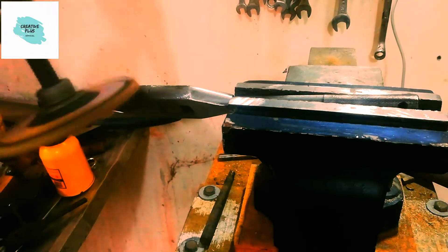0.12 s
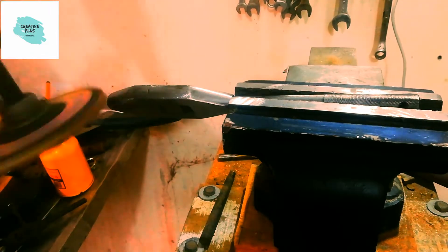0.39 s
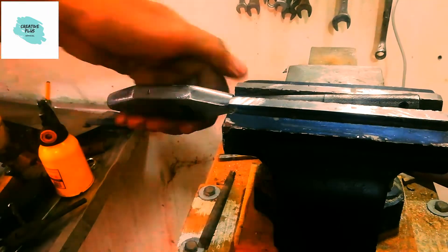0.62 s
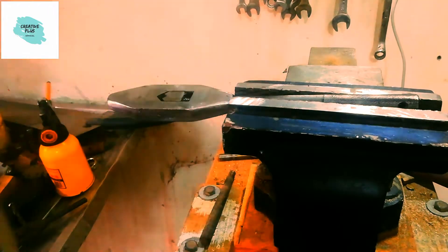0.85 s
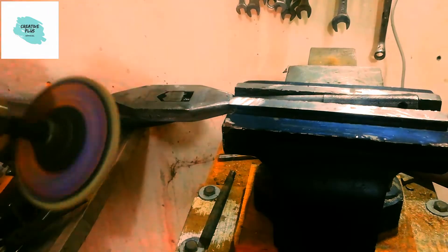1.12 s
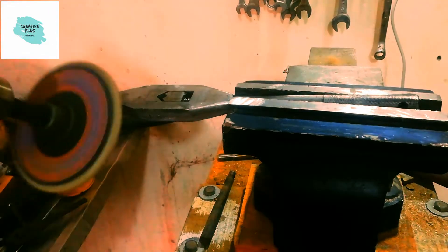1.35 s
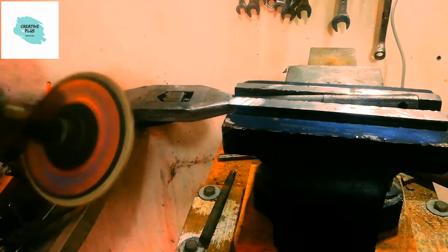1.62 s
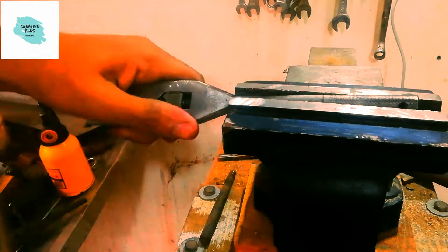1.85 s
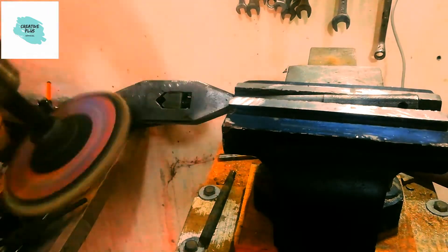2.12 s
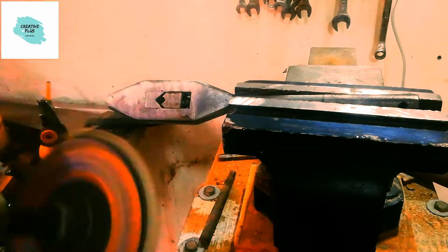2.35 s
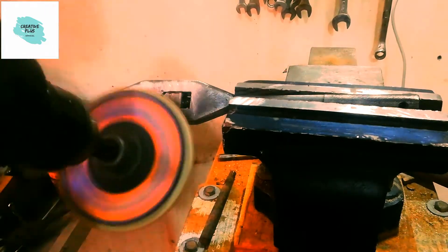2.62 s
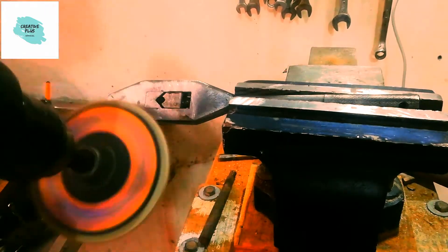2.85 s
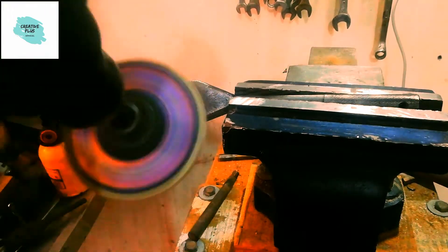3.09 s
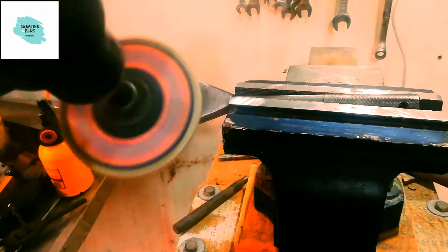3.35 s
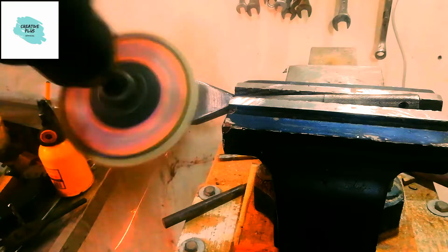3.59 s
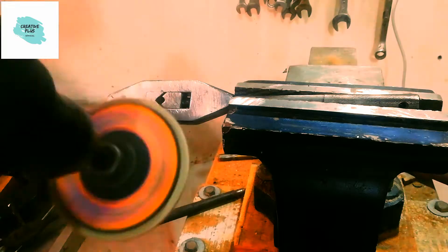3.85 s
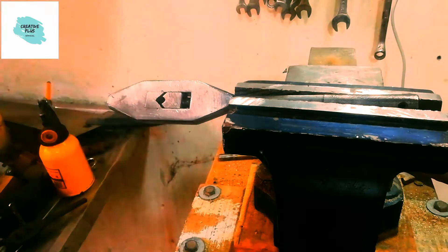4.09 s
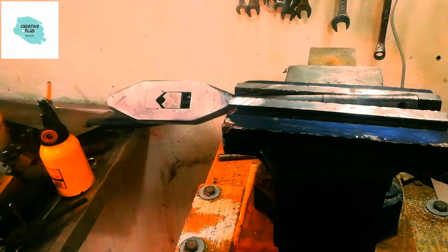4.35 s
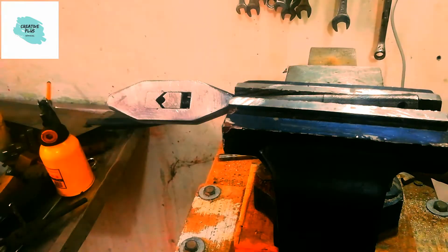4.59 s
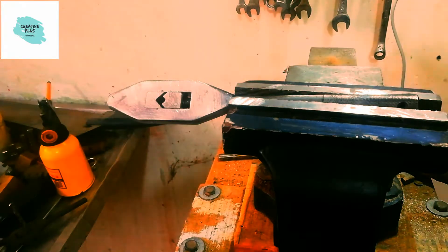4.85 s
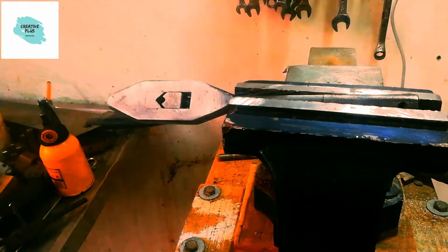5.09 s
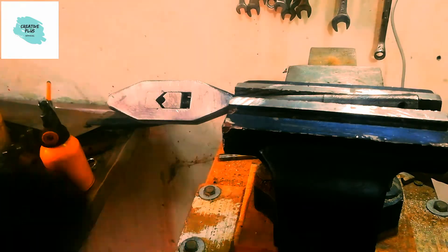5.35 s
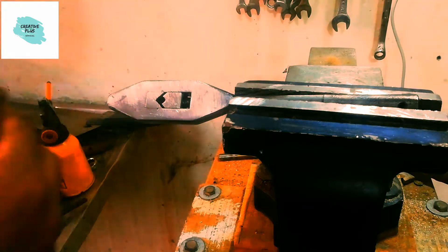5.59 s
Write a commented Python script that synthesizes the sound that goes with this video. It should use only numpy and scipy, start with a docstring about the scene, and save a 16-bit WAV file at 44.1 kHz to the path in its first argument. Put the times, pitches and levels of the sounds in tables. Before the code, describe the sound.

Close stereo sound in a small, dry workshop. From 0 s a hand-held disc grinder is already running: dense airy roar around 4 to 5 kHz, brighter hiss on top, a lower motor drone and faint fast flutter, weighted somewhat right. A brief gust pops at 0.5 s. From 1 to 1.7 s its draught batters the microphone with low thuds and raspy crackle, the level ducking; sharp bursts return at 2.0 and 2.35 to 2.6 s. A gear whine near 1.9 kHz, pulsing about forty times a second, strengthens from 2.5 to 4 s, sagging in pitch, with more gusts. Around 4.05 and 4.12 s light knocks ring clamped steel. The tool moves far right; from 4.5 to 5 s a thin high whine drops rapidly as it coasts and rattles on the bench. Short hollow drags come at 5.1 and 5.2 s, then soft grainy wipes at 5.4 and 5.65 s over near silence.

```python
"""Power tool close to the microphone in a small workshop

A hand-held tool with an abrasive disc runs near a two-port microphone: fan air hisses (coloured noise), gears sing (tones).
Its draught sweeps eddies (pressure pulses) across the ports, so that the limiter ducks.
The tool is carried off to the right and its fan whine sinks as it coasts; light knocks ring clamped steel (damped sines).
Then something is dragged over the bench (slips through resonances) and wiped (grainy noise); the room stays quiet."""
import sys
import numpy as np
from scipy import signal
from scipy.fft import rfft, irfft, next_fast_len
from scipy.io import wavfile
from scipy.ndimage import uniform_filter1d, minimum_filter1d, map_coordinates

SR = 44100
rng = np.random.default_rng(int(sys.argv[2]) if len(sys.argv) > 2 else 0)


def voltage_ratio(decibels):
    """Convert decibels (scalar or array-like) to amplitude ratios, 20 dB per decade."""
    exponent = np.asarray(decibels, float) / 20
    return 10 ** exponent


def put_to_file(sound):
    """Save the sound as 16-bit audio at rate SR, in the file named by the first command-line argument."""
    columns = np.atleast_2d(sound).T  # one column per channel
    safe = np.clip(columns, -1, 1)
    whole_steps = np.round(safe * 32767)
    wavfile.write(sys.argv[1], SR, whole_steps.astype(np.int16))


N = 251811  # length [samples]

# the tool as it is moved and turned before the microphone:
# (time [s], roar level [dB], roar left over right [dB], hiss over roar [dB])
TOOL_PATH = [(0, -25, -8, 2.5), (.55, -24, -4.5, 2.5), (.71, -24.5, -9.5, 0.5), (.96, -23.5, -5, 3.5),
             (1.23, -25, -4.5, 3), (1.54, -26.5, -5, 3.5), (1.87, -23.5, -6, 1.5), (2.05, -26, -4, 3.5),
             (2.22, -24, -7.5, 5.5), (2.33, -24, -4.5, 3.5), (2.42, -22.5, 0.5, 0.5),
             (2.52, -23, -2.5, 1.2), (3.8, -23, -2, 0.1), (4.36, -26, -11, 4.5), (4.53, -26, -20.5, 4.5),
             (4.7, -32.5, -35, 5), (4.82, -39, -17, 2), (5.08, -52, -18, -1.2)]


def unit(x):
    """x at rms 1."""
    return x / np.sqrt(np.mean(x ** 2) + 1e-20)


def curves(rows):
    """One value per sample for each column after the time."""
    s, *columns = np.transpose(rows)
    return [np.interp(np.arange(N) / SR, s, column) for column in columns]


def during(rows):
    """1 while a table lasts, fading to 0 over 29 ms outside it."""
    t = np.arange(N) / SR
    return np.clip(np.minimum(t - rows[0][0], rows[-1][0] - t) / 0.029 + 1, 0, 1)


def wobble(rate):
    """A smooth random curve, rate knots a second."""
    knots = rng.standard_normal(int(N * rate / SR) + 4)
    return map_coordinates(knots, [np.arange(N) * rate / SR])


def throb(depth, rate, turn):
    """A swell that repeats rate times a second, starting at a phase in turns."""
    return 1 + depth * np.cos(2 * np.pi * (rate * np.arange(N) / SR + turn))


def tone(hz):
    """A sine of rms 1 on a pitch curve."""
    return np.sqrt(2) * np.sin(2 * np.pi * np.cumsum(hz) / SR)


def filtered(x, response):
    """x times a complex response of frequency."""
    m = next_fast_len(N + 8192)
    return irfft(rfft(x, m) * response(np.fft.rfftfreq(m, 1 / SR)), m)[..., :N]


def late(x, ms):
    """x delayed by ms milliseconds."""
    return filtered(x, lambda hz: np.exp(-2j * np.pi * hz * ms / 1000))


def noise(spectrum, patchy_db=1.5):
    """Noise of rms 1 coloured by (Hz, dB) points, with patches of random gain."""
    f, db = np.transpose(spectrum)
    z = signal.stft(rng.standard_normal(N), nperseg=512)[2]
    field = uniform_filter1d(rng.standard_normal(z.shape), size=4, axis=0)
    field = uniform_filter1d(field, size=8, axis=1)
    patchy = signal.istft(z * voltage_ratio(patchy_db * unit(field)), nperseg=512)[1][:N]
    return unit(filtered(patchy, lambda hz: voltage_ratio(np.interp(np.log(hz + 1), np.log(f + 1), db))))


def strokes(rows, rise, fall):
    """dB per sample of each (start, end, dB, dB) row: a rise, a slope from start to end, a fall (dB per s)."""
    s0, s1, db0, db1 = np.transpose(rows)[:4, :, None]
    t = np.arange(N) / SR
    progress = np.clip((t - s0) / np.maximum(s1 - s0, 1 / SR), 0, 1)
    slope_db = db0 + (db1 - db0) * progress
    return slope_db - rise * np.maximum(s0 - t, 0) - fall * np.maximum(t - s1, 0)


def ports(make, pan_db, direct):
    """Two ports: a shared direct sound, earlier on the nearer side, and the room's share, different on each."""
    away_s, back_s = 4.08, 5.36  # sounds come from the right of the microphone between these times
    near, t = make(), np.arange(N) / SR
    gone = np.clip(np.minimum(t - away_s, back_s - t) / 0.055, 0, 1)
    left = (1 - gone) * near + gone * late(near, 0.656)
    right = (1 - gone) * late(near, 0.3576) + gone * near
    direct = np.clip(direct, 0, 1)  # share of the power
    shared, diffuse = np.array([left, right]), np.array([make(), make()])
    pair = np.sqrt(direct) * shared + np.sqrt(1 - direct) * diffuse
    sides = voltage_ratio(np.array([pan_db / 2, -pan_db / 2]))
    return pair * sides * 2 / np.hypot(*sides)  # the same total power for any pan


def dip_db():
    """Brief dips of the air noise under the hardest gusts, as a depth in dB at each sample."""
    # (time [s], depth in the roar [dB], a negative depth being a swell, half width [s])
    dips = [(1.09, 8, 0.12), (2.01, -0.5, .05), (2.36, 3, 0.06), (2.461, 4, .05)]
    t = np.arange(N) / SR
    return sum(db * np.clip(1 - np.abs(t - s) / half, 0, 1) for s, db, half in dips)


def air():
    """Cooling air torn by the fan: a roar with the vent's resonance, a hiss and its thin top, flickering together."""
    # colours of the three bands: (frequency [Hz], relative level [dB])
    roar_colour = [(1350, -36.5), (2300, -9.5), (2840, -2.5), (3950, 3.5), (4750, 2.5), (5470, -1),
                   (6000, -4), (7800, -15), (13200, -120)]
    hiss_colour = [(3530, -37.5), (6000, -3), (7370, -1), (8470, 1), (9470, -4), (10500, -9.5),
                   (13600, -27.5), (22000, -120)]
    top_colour = [(6180, -46), (10500, -7.5), (12300, -1), (15100, -4), (15900, -17)]
    # the vent's resonance shifts as the tool is turned: (time [s], frequency [Hz])
    vent = [(0.0, 4130), (0.42, 3950), (0.48, 4745), (1.04, 4550), (1.13, 4245), (1.91, 4650), (2.18, 4250),
            (2.5, 4776), (2.88, 4190), (3.48, 3997), (4.6, 4520)]
    hiss_dip, top_dip = 1.38, 1.8  # dip depth over that of the roar
    top_over_hiss_db, top_lost = -12, 0.59  # top_lost: dB per dB of turning right
    roar_level_db, roar_pan, bright_db = curves(TOOL_PATH)
    hiss_pan = 2.2 * roar_pan - 6  # dB; the hiss beams more narrowly than the roar
    roar_db = roar_level_db - dip_db()
    hiss_db = roar_level_db + bright_db - hiss_dip * dip_db()
    top_db = roar_level_db + bright_db + top_over_hiss_db + top_lost * roar_pan - top_dip * dip_db()
    flicker = 0.78 * wobble(12) + 0.82 * wobble(30)  # dB

    def roar_noise():
        resonance = unit(wobble(1100)) * tone(curves(vent)[0])
        return noise(roar_colour) + voltage_ratio(-6.5) * resonance

    roar = voltage_ratio(roar_db + flicker) * ports(roar_noise, roar_pan, direct=0.48)
    hiss = voltage_ratio(hiss_db + flicker) * ports(lambda: noise(hiss_colour), hiss_pan, direct=0.13)
    top = voltage_ratio(top_db + flicker) * ports(lambda: noise(top_colour), 0.25 * hiss_pan, direct=0.37)
    flutter = throb(0.14, 43.02, -.15)  # the air noise flutters faintly
    return (roar + hiss + top) * flutter * during(TOOL_PATH)


def motor():
    """The housing drones; armature and gear mesh are tones with a fuzzy skirt."""
    # housing colour: (frequency [Hz], relative level [dB])
    drone_colour = [(35, -81), (60, -42), (312, -20), (485, -14), (650, -11.5), (964, -2.5), (1500, -3.5),
                    (2000, -0.5), (2600, -9), (3400, -17.5), (6000, -120)]
    # armature hum: (time [s], level [dB])
    hum_levels = [(0, -40.5), (2.2, -44), (3, -35), (4.5, -42.5), (4.58, -66)]
    # gear mesh: (time [s], pitch [Hz], level [dB])
    gears = [(0, 1960, -52), (1.1, 1970, -45), (1.33, 1970, -30), (1.82, 1969, -38.5), (2.5, 1990, -32.5),
             (2.72, 1944, -24), (3.02, 1881, -22.5), (3.2, 1886, -27.5), (3.4, 1887, -27), (3.7, 1885, -27),
             (3.85, 1915, -21.5), (4, 1898, -29.5), (4.1, 1954, -45), (4.4, 1980, -44.5)]
    off_s, coast_db_per_s = 4.644, 42  # the drone fades as the motor coasts
    free_hz, free_rough, rough_per_hz = 1970, .8, .0085  # load pulls the mesh down and steadies it
    disc_hz, disc_turn, wander_turns = 40.9, .46, .07  # disc turns a second; start and scatter in turns
    coast_db = coast_db_per_s * np.maximum(np.arange(N) / SR - off_s, 0)
    drone_db = -30.5 - 0.22 * dip_db() - coast_db
    pan_db = 0.77 * curves(TOOL_PATH)[1] + 5
    drone = voltage_ratio(drone_db + 0.72 * wobble(20)) * ports(lambda: noise(drone_colour), pan_db, direct=0.25)
    hum_swell = 0.93 + 0.49 * unit(wobble(50))
    hum = voltage_ratio(curves(hum_levels)[0]) * hum_swell * tone(482 + 7 * wobble(30))
    mesh_hz, mesh_db = curves(gears)
    rough = np.clip(free_rough - rough_per_hz * (free_hz - mesh_hz), 0, 1)
    swell = unit(throb(1.0, disc_hz, disc_turn + wander_turns * wobble(9)) ** 1.02)  # once per turn
    # worn teeth roughen the swell
    teeth = swell * (np.sqrt(1 - rough) * voltage_ratio(1.3 * wobble(40)) + np.sqrt(rough) * unit(wobble(260)))
    mesh = voltage_ratio(mesh_db + 0.9 * wobble(14)) * teeth * tone(mesh_hz + 5 * wobble(35)) * during(gears)
    body = (drone + np.array([hum, late(hum, 0.69)])) * during(TOOL_PATH)
    return body + np.array([voltage_ratio(4.0) * mesh, voltage_ratio(-5.5) * late(mesh, 0.37)])


def whine():
    """The blade tone falls into hearing as the fan slows, sinking in small steps."""
    # fan blade whine while coasting: (time [s], pitch [Hz], level [dB])
    blade = [(4.51, 15700, -50), (4.54, 14900, -32), (4.62, 12700, -35), (4.7, 10450, -29),
             (4.8, 8200, -31), (4.85, 7250, -41), (4.97, 5400, -54)]
    first_s, step_s = 4.542, .0239
    s, hz, db = np.transpose(blade)
    t = np.arange(N) / SR
    step = (t - first_s) / step_s
    # within each step the pitch follows only 0.45 of the slope
    held = first_s + step_s * (np.floor(step) + .5 + 0.45 * (step % 1 - .5))
    pitch = uniform_filter1d(np.interp(held, s, hz), size=60)
    sine = np.sin(2 * np.pi * np.cumsum(pitch + 40 * wobble(390)) / SR)
    blade_tone = voltage_ratio(np.interp(t, s, db) + 4.7 * wobble(70)) * sine * during(blade)
    return blade_tone * voltage_ratio(np.array([[-9.5], [3.5]]))


def draught():
    """Each eddy is a suction then a push; it drifts from one port to the other and arrives smoother."""
    # gusts over the ports: (start [s], end [s], level at start [dB], level at end [dB])
    gusts = [(.485, .495, -25, -24.5), (1, 1.24, -18, -16.5), (1.27, 1.38, -26.5, -23.5),
             (1.39, 1.67, -16, -21), (1.985, 2.005, -12.5, -9), (2.34, 2.37, -12.5, -7),
             (2.45, 2.75, -18.5, -34), (2.76, 2.89, -30, -25.5), (2.95, 3.11, -36.5, -21.5),
             (3.12, 3.62, -20, -25.5), (3.685, 3.695, -25, -20), (3.78, 3.93, -20.5, -20),
             (3.98, 4.05, -19.5, -21), (4.09, 4.34, -40.5, -66), (4.6, 4.86, -41.5, -53.5),
             (4.87, 5.71, -49, -55.5)]
    # the strongest eddies: (time [s], level [dB], trough-to-crest time [ms])
    strong = [(1.03, 1.5, 0.59), (1.051, -4, 5.5), (1.077, -5, 0.59), (1.083, -2, 1.1), (1.098, -3, 3.5),
              (1.112, -10, 2.8), (1.126, -9, 2.6), (1.141, -4, 2.6), (1.164, -2, 2.8), (1.17, -6, 1.08),
              (1.188, 4, 1.7), (1.238, -9, 3.1), (1.37, -2, 1.2), (1.394, -1.5, 4.9), (1.451, -6, 1.4),
              (1.468, -3.5, 1.9), (1.512, 0, 1.4), (1.582, 2.5, 1.9), (1.652, 4, 1.6), (1.998, 5, 1.4),
              (2.355, 5, 1.2), (2.437, -1.5, 0.77), (2.45, 2.5, 0.8), (2.464, 2, 1.2), (2.509, -8, 1.5),
              (2.606, -10.5, 1.7), (2.89, -3.5, 1.5), (3.113, -4.5, 2.1), (3.16, -6, 1.4),
              (3.297, -7, 1.45), (3.523, -8, 2.5), (3.786, -3, 1.24), (3.977, -5.5, 1.5), (4.019, -4, 2.15)]
    # colours of the gusts' rumble and of the rasp: (frequency [Hz], relative level [dB])
    gust_colour = [(15, -40), (60, -6), (120, 0), (250, -3), (500, -9), (900, -18), (2000, -120)]
    crackle_colour = [(150, -35), (400, 1.5), (900, -7), (1800, -6.5), (4000, -20.5), (8000, -120)]
    rise, fall, calm_db = 810, 750, -60.5  # dB per s, dB per s, still air
    turn_s = 2.9  # the draught reaches the left port first before this, the right port after
    level_db = np.maximum(strokes(gusts, rise, fall).max(0), calm_db)
    draw = rng.standard_normal((1500, 2))
    times = np.sort(rng.uniform(0, N / SR, 1500))
    small = np.c_[times, 4.5 * draw[:, 0], 1.9 * np.exp(.6 * draw[:, 1])]  # s, dB, ms

    def swirl(rows):
        s, db, ms = np.transpose(rows)[:, :, None]
        u = np.arange(-400, 900) / SR * 1000 / ms
        suction = 1.08 * np.exp(-np.where(u < 0, 1.8, 3.5) * np.abs(u))  # a pointed core with a steep back
        shape = 0.47 * np.exp(-((u - 1) / 0.7) ** 2) - suction
        at = np.round(s * SR).astype(int) + np.arange(1300)
        return np.bincount(at.ravel(), (voltage_ratio(db) * shape).ravel(), N + 1300)[400:N + 400]

    rumble = .5 * voltage_ratio(5.8 * wobble(60)) * noise(gust_colour)
    eddies = voltage_ratio(level_db + 2.5) * unit(unit(swirl(small)) + rumble) + swirl(strong)
    steep = uniform_filter1d(np.abs(np.gradient(eddies)), size=160) * SR / 1000  # pressure change per ms

    def crackle():
        return steep ** 1.27 * noise(crackle_colour)

    eddies = eddies + voltage_ratio(-12.0) * crackle()  # steep fronts break up into a rasp, partly carried along
    first = eddies + voltage_ratio(-10) * crackle()
    second = eddies + voltage_ratio(level_db - 11.0) * noise(gust_colour)
    second = filtered(late(second, 0.66), lambda hz: 1 / (1 + 1j * hz / 700))
    turned = np.clip((np.arange(N) / SR - turn_s) / .01, 0, 1)
    return np.array([first + turned * (second - first), second + turned * (first - second)])


def taps():
    """Light knocks ring the clamped steel: decaying sines with a soft onset."""
    # knocks: (time [s], level [dB])
    knocks = [(4.055, -20), (4.125, -12.5), (4.19, -37), (5.321, -50)]
    # modes of the steel: (frequency [Hz], relative level [dB], time to fall 60 dB [s])
    steel = [(4052, 0, .1), (10342, 2, .09)]
    out, t = np.zeros(N + SR), np.arange(SR // 2) / SR
    for s, db in knocks:
        ring = sum(voltage_ratio(level - 60 * t / t60) * np.sin(2 * np.pi * hz * t) for hz, level, t60 in steel)
        out[round(s * SR):][:len(t)] += voltage_ratio(db) * ring * (1 - np.exp(-t / 0.0087))
    return out[:N] * voltage_ratio(np.array([[-7.5], [3.5]]))


def drag():
    """Uneven slips excite the bench: its low board mode and the higher ones each follow their own level."""
    # the tool on the bench, coasting and then dragged twice:
    # (start [s], end [s], rattle level at start [dB], at end [dB])
    rattles = [(4.6, 5.0, -29, -42.5), (5.085, 5.145, -32, -33.5), (5.2, 5.235, -41.5, -34)]
    # the board rings under it: (start [s], end [s], level at start [dB], at end [dB])
    rings = [(4.6, 4.7, -37.5, -51), (4.71, 5.07, -48, -51.5), (5.09, 5.148, -38, -29),
             (5.2, 5.23, -51, -35)]
    # bench modes, the low board mode first: (frequency [Hz], width [Hz], relative level [dB])
    bench = [(409.5, 22, 0), (937, 180, -8), (1313, 66, -4.5), (1500, 55, -5), (2400, 500, -15),
             (3430, 360, -17.5), (5030, 520, -25)]
    rise, rattle_fall, ring_fall = 990, 520, 800  # dB per s
    scrape_db = strokes(rattles, rise, rattle_fall).max(0)
    ring_db = strokes(rings, rise, ring_fall).max(0)

    def slips_through(rows):
        def modes(f):
            return sum((-1) ** k * voltage_ratio(db) * 1j * f * w / (c * c - f * f + 1j * f * w)
                       for k, (c, w, db) in enumerate(rows))
        slips = rng.standard_normal(N) * voltage_ratio(4.0 * wobble(300))
        return unit(filtered(slips, modes))

    scrape = voltage_ratio(scrape_db) * ports(lambda: slips_through(bench[1:]), np.full(N, -3.5), direct=0.53)
    ring = voltage_ratio(ring_db) * ports(lambda: slips_through(bench[:1]), np.full(N, -1.5), direct=0.99)
    return scrape + ring


def wipe():
    """Cloth fibres rub: grainy noise under each stroke."""
    # wiping strokes: (start [s], end [s], level at start [dB], at end [dB], dull part over bright [dB])
    wipes = [(5.05, 5.145, -56, -47.5, -21), (5.188, 5.227, -47, -42.5, -16), (5.253, 5.355, -59, -64, -1),
             (5.412, 5.47, -37, -48.5, -9.5), (5.485, 5.511, -59, -59.5, 7.5),
             (5.622, 5.71, -49, -50.5, 5.5)]
    # colours of the two parts: (frequency [Hz], relative level [dB])
    dull_colour = [(350, -16), (700, -11), (1300, -6), (2000, -6.5), (2600, -12), (3250, -21), (3400, -6),
                   (3550, -17), (4600, -23), (7700, -120)]
    bright_colour = [(1470, -60), (2500, -17), (4100, -5), (5060, -9), (8690, -8.5), (11500, -26),
                     (13400, -26), (15900, -35)]
    rise, fall, rest_db = 1500, 440, -67  # dB per s, dB per s, between strokes
    stroke_db = strokes(wipes, rise, fall)
    bright_db = np.maximum(stroke_db.max(0), rest_db)
    dull_db = np.maximum((stroke_db + np.transpose(wipes)[4, :, None]).max(0), rest_db)
    grain = voltage_ratio(1.4 * wobble(310))
    dull = voltage_ratio(dull_db) * ports(lambda: noise(dull_colour), np.full(N, -2.5), direct=0.29)
    bright = voltage_ratio(bright_db) * ports(lambda: noise(bright_colour), np.full(N, -11.5), direct=0.37)
    return (dull + bright) * grain


def room():
    """The workshop's quiet background: steady coloured noise."""
    # (frequency [Hz], relative level [dB])
    floor_colour = [(35, -43), (60, -24), (149, 14), (238, -20), (354, -25), (7190, -38), (15900, -44)]
    return voltage_ratio(-85) * ports(lambda: noise(floor_colour), np.zeros(N), direct=1.0)


def scene():
    """All sources at the two ports."""
    return air() + motor() + whine() + draught() + taps() + drag() + wipe() + room()


def band_limit(x):
    """A steep low-pass at the top of the band."""
    return signal.sosfilt(signal.butter(12, 16150, fs=SR, output="sos"), x)


def record(dry):
    """The capsule loses the deepest bass; a limiter ducks both ports around and after each pressure peak."""
    heard = filtered(dry, lambda hz: (1j * hz / (42 + 1j * hz)) ** 2)
    need = np.minimum(1, voltage_ratio(-1.2) / (np.abs(heard).max(0) + 1e-9))
    held = minimum_filter1d(need, size=900, origin=300)  # mostly after the peak
    gain = uniform_filter1d(held, size=300)
    return band_limit(heard * gain)


dry = scene()
out = record(dry)
put_to_file(out)
```